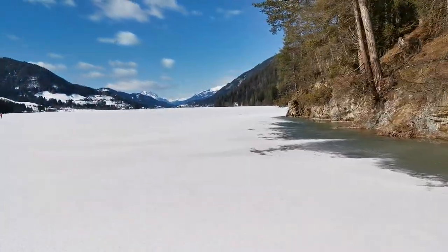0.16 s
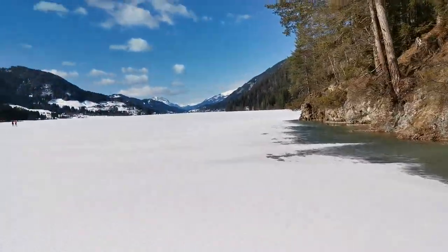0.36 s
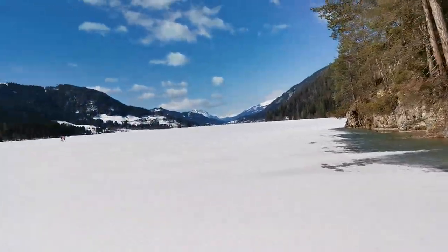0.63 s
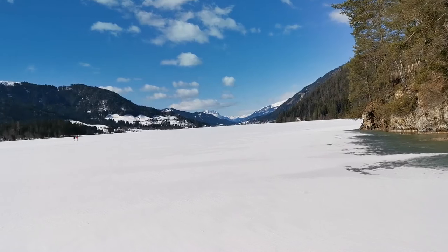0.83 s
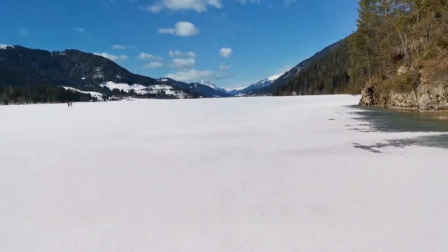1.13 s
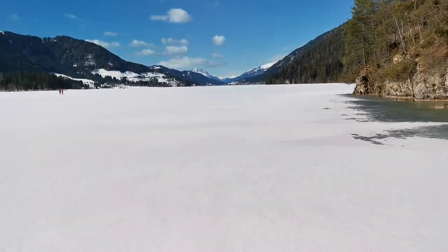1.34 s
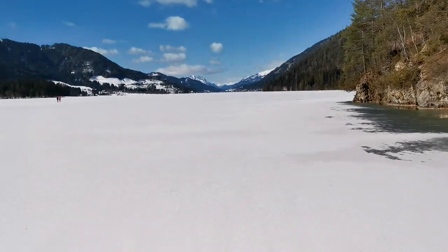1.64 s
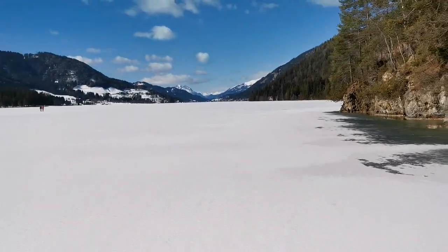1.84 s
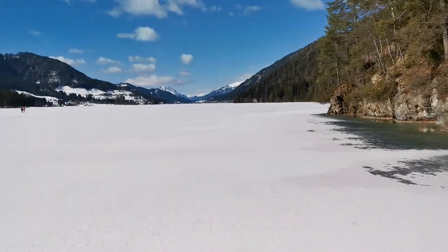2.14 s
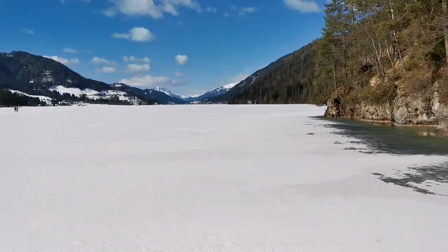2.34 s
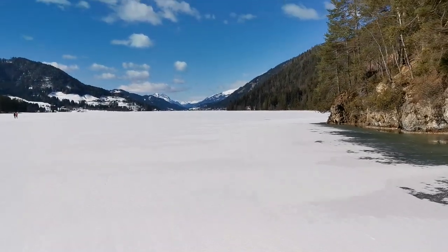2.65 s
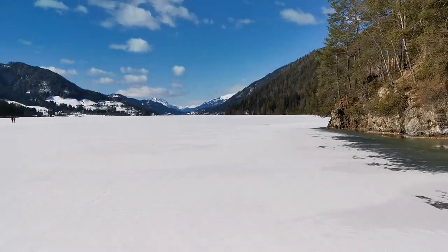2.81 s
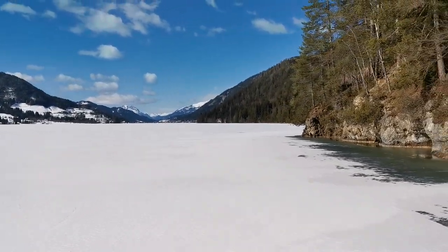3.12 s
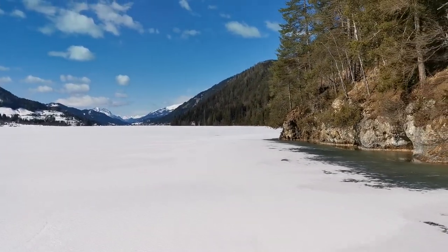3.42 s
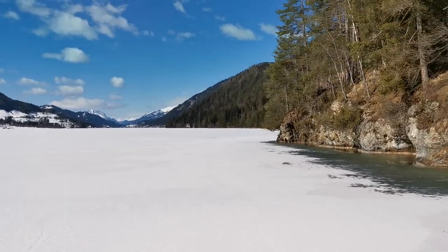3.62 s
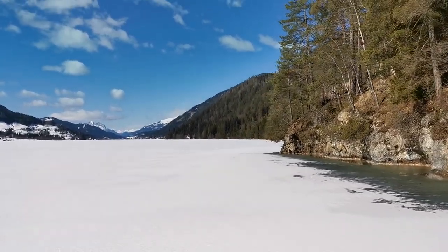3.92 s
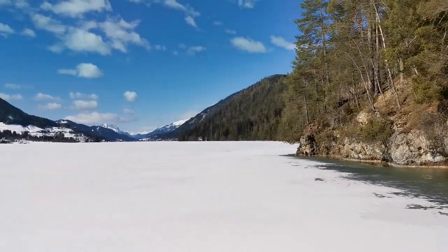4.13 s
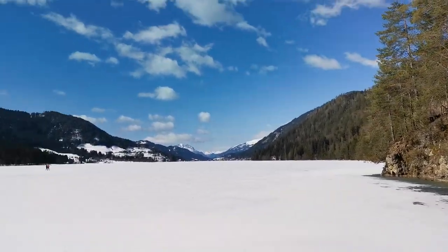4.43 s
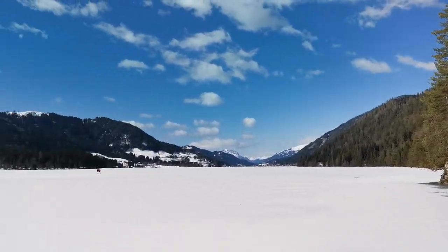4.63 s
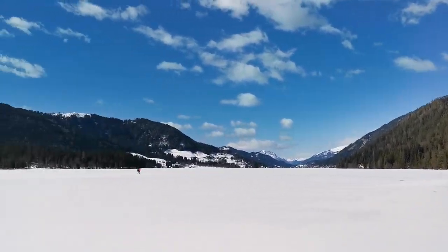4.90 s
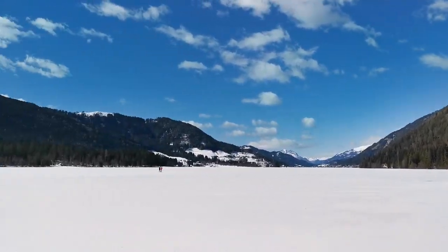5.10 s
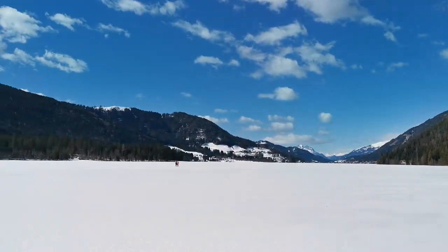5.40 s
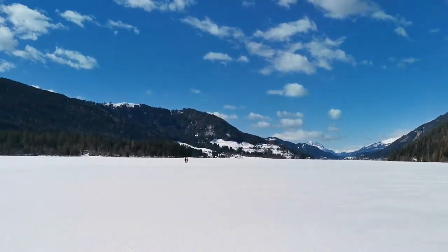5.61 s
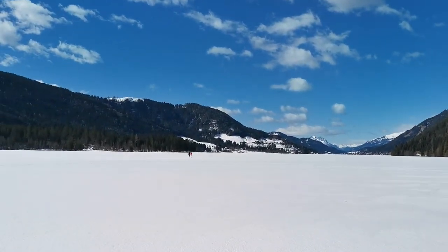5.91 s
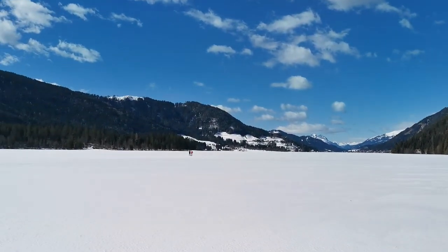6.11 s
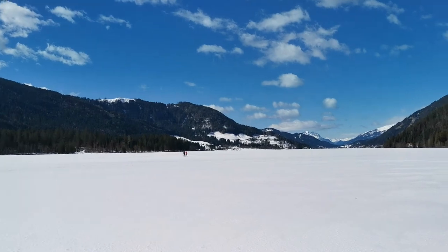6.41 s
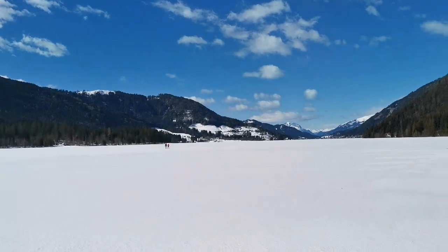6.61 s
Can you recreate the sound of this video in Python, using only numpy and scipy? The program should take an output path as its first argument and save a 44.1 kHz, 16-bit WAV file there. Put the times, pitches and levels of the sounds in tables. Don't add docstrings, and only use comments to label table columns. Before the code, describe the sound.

Close beneath a handheld microphone, skate blades bite crusted lake ice. A dense burst of hard snaps, bright chips and low thumps fills the first second, then thins into irregular ticks and short scrapes over a quiet steel hiss and faint ice drone. A second scrape comes after four seconds. Near the end, heavy wind buffeting swells suddenly, mostly on the right, covering the blades.

```python
import sys
import numpy as np
from scipy import signal
from scipy.fft import rfft, irfft, next_fast_len
from scipy.io import wavfile
from scipy.ndimage import uniform_filter1d, map_coordinates

SR = 44100
rng = np.random.default_rng(int(sys.argv[2]) if len(sys.argv) > 2 else 0)


def ratio_of_db(decibels):
    return 10 ** (np.asarray(decibels, float) / 20)


def inscribe(sig):
    pcm = np.round(np.clip(np.atleast_2d(sig).T, -1, 1) * 32767)
    wavfile.write(sys.argv[1], SR, pcm.astype(np.int16))


N = 297675


def unit(x):
    return x / np.sqrt(np.mean(x ** 2) + 1e-20)


def along(points, hz):
    f, v = np.transpose(points)
    return np.interp(np.log(hz + 1), np.log(f + 1), v)


def wobble(rate):
    knots = rng.standard_normal(int(N * rate / SR) + 4)
    return map_coordinates(knots, [np.arange(N) * rate / SR])


def filtered(x, response):
    m = next_fast_len(N + 8192)
    return irfft(rfft(x, m) * response(np.fft.rfftfreq(m, 1 / SR)), m)[..., :N]


def pulse(points, size=1024):
    cepstrum = irfft(np.log(ratio_of_db(along(points, np.fft.rfftfreq(4096, 1 / SR)))))
    cepstrum[1:2048] *= 2
    cepstrum[2049:] = 0
    fade = np.hanning(2 * size)[size:]
    response = irfft(np.exp(rfft(cepstrum)))[:size] * fade
    return response[None] / np.linalg.norm(response)


def coloured(x, points):
    return signal.fftconvolve(x, pulse(points, size=2048), axes=1)[:, :N]


def fractures(lumpy_db, rate):
    return ratio_of_db(lumpy_db * np.minimum(wobble(rate), 2)) * rng.standard_normal((2, N))


def self_noise():
    return ratio_of_db(-78.5) * rng.standard_normal((2, N))


def swells(s, peak_db, width_s):
    return ratio_of_db(peak_db - 10 * ((np.arange(N) / SR - s) / width_s) ** 2)


def steady(x):
    return x / np.sqrt(np.abs(uniform_filter1d(x ** 2, SR // 16, axis=1)))


# (peak time [s], peak level [dB], time from peak to 10 dB down [s],
# sharp edge over the buffet [dB])
GUSTS = [(.24, -43, 0.08, -30), (.84, -42.5, 0.19, -23), (5.05, -54, 0.31, -30), (5.27, -46.5, 0.6, -5.5),
         (5.43, -41.5, 0.39, -6), (5.53, -35, 0.15, -21), (5.76, -39.5, 0.0855, -26),
         (6.225, -23, 0.01, -2.5), (6.268, -23.5, 0.06, -7), (6.291, -21, 0.0351, 1),
         (6.342, -18, 0.04, -7), (6.415, -22.5, 0.02, -8.5), (6.447, -24, -0.0265, -0.5),
         (6.478, -16.5, 0.0483, -2.5), (6.515, -15.5, 0.028, -6), (6.579, -18.5, 0.04, 3.5),
         (6.605, -17.5, 0.0457, 1.5), (6.635, -16, 0.0421, -1.5), (6.686, -21, 0.006, 1),
         (6.725, -19, -0.0136, -7.5)]
# (frequency [Hz], level [dB])
BUFFET_COLOUR = [(20, -13), (45, -12), (90, 0), (170, 0), (260, -9), (500, -35), (2000, -90)]
# (frequency [Hz], level [dB])
EDGE_COLOUR = [(120, -19), (270, 1.5), (430, -2.5), (800, -13), (1500, -27), (3000, -55), (8000, -87)]
# (frequency [Hz], level [dB])
SWAY_COLOUR = [(15, -22.5), (35, 4), (70, 5), (110, -17.5), (300, -69.5)]


def wind():
    calm_db, calm_edge_db, lee_db = -61, -88.5, -59.5
    full_db = 26.5
    s, peak_db, width_s, edge_db = np.transpose(GUSTS)[..., None]
    right = ratio_of_db(calm_db) + swells(s, peak_db, width_s).max(0)
    edge = ratio_of_db(calm_edge_db) + swells(s, peak_db + edge_db, 0.61 * width_s).max(0)
    gust = right / ratio_of_db(calm_db)
    puff = swells(s=6.165, peak_db=-41.5, width_s=0.018)
    left = ratio_of_db(lee_db) * gust ** 0.36 + puff

    lumps = np.array([wobble(38), wobble(25)])
    slow = steady(coloured(ratio_of_db(2.1 * lumps) * rng.standard_normal((2, N)), BUFFET_COLOUR))
    fast = steady(coloured(ratio_of_db(4.5 * wobble(200)) * rng.standard_normal((1, N)), EDGE_COLOUR))
    sway_response = lambda hz: ratio_of_db(along(SWAY_COLOUR, hz)) * (hz > 10)
    sway = unit(filtered(rng.standard_normal((2, N)), sway_response))

    buffet = np.array([left, right * np.minimum(gust / ratio_of_db(full_db), 1) ** 0.4]) * slow
    spikes = ratio_of_db([[-47], [0]]) * edge * fast
    leak = ratio_of_db(-59.0) * slow[::-1]
    limited = np.minimum(gust, ratio_of_db(full_db))
    push = np.array([ratio_of_db(-76) * limited ** 1.26 + puff, ratio_of_db(-66) * limited ** 1.06])
    return buffet + spikes + leak + push * sway


# (time [s], pressure of the steel [dB], flexing of the sheet [dB])
GLIDE = [(0, -42, -65), (.3, -48, -62), (.6, -46, -49), (1, -44.5, -52), (1.6, -47, -58), (2.3, -45.5, -51),
         (3.2, -45.5, -56), (4, -46, -45), (4.4, -40, -58), (4.7, -49.5, -48), (5.2, -50.5, -46),
         (5.5, -51.5, -59.5), (5.8, -49.5, -47), (6.0, -43, -48.5), (6.15, -51.5, -60), (6.35, -42, -62),
         (6.6, -64, -59), (6.75, -55, -51.5)]
# (frequency [Hz], level [dB])
HISS_COLOUR = [(1200, -27), (2100, -8), (3100, 4.5), (4500, -4), (7300, 1), (8600, -16.5), (10000, -32.5),
               (15500, -33)]
# (frequency [Hz], width [Hz], level [dB])
SHEET_MODES = [(128, 32, 0), (232, 40, -2)]
# (frequency [Hz], level [dB])
THUMP_COLOUR = [(50, -17.5), (120, -2.5), (250, 3), (600, -2.5), (1000, -10.5), (3000, -66), (9000, -100)]
# (frequency [Hz], level [dB])
CRACK_COLOUR = [(150, -56), (500, -4.5), (900, 2), (1200, -2), (1600, -5), (2100, -0.5), (2700, -7),
                (4000, -26), (9000, -99)]


def sheet(f):
    return sum(ratio_of_db(db) * (1j * f * w / (c * c - f * f + 1j * f * w)) ** 2 for c, w, db in SHEET_MODES)


def glide():
    s, slide_points, drone_points = np.transpose(GLIDE)
    t = np.arange(N) / SR
    slide_db = np.interp(t, s, slide_points)
    drone_db = np.interp(t, s, drone_points)
    hiss_db = -55 + 0.57 * (slide_db + 44.5)
    pressure = wobble(35)
    slide = coloured(unit(fractures(lumpy_db=6.5, rate=250) * ratio_of_db(1.3 * pressure)), CRACK_COLOUR)
    hiss = coloured(unit(fractures(lumpy_db=2.5, rate=410) * ratio_of_db(0.5 * pressure)), HISS_COLOUR)
    body = coloured(unit(fractures(lumpy_db=4.5, rate=50) * ratio_of_db(2.0 * pressure)), THUMP_COLOUR)
    drone = unit(filtered(fractures(lumpy_db=4.5, rate=7.9), sheet))
    steel = ratio_of_db(slide_db - 9.0) * slide + ratio_of_db(slide_db - 10.0) * body + ratio_of_db(hiss_db + 0.5) * hiss
    return steel + ratio_of_db(drone_db - 2.1) * drone


def with_give(rows, give_db):
    return [(s, ms, db, give_db, spray_db) for s, ms, db, spray_db in rows]


def alike(rows, ms, spray_db):
    return [(s, ms, db, spray_db) for s, db in rows]


# (frequency [Hz], level [dB])
SPRAY_COLOUR = [(1200, -46.5), (2400, -3), (3000, 2), (4300, 0), (5300, -3.5), (7100, 0), (7800, -5.5),
                (8500, -17), (10000, -29.5), (14300, -36.5), (15500, -45)]


def bites(rows, plates, lumpy_db, rate, first, fade_db, crumbs_db, plate_hz, spread_db):
    grains = np.pad(unit(fractures(lumpy_db, rate)), ((0, 0), (0, SR)), "wrap")
    voices = [pulse(colour) for colour in (THUMP_COLOUR, CRACK_COLOUR, SPRAY_COLOUR)]
    out = np.zeros((2, N + SR))
    rings = rng.standard_normal((len(rows), 2))
    large = np.array(plates)
    for (s, ms, db, thump_db, spray_db), (pitch, strength) in zip(rows, rings):
        start = round(s * SR)
        t = np.arange(round((ms + 12) * SR / 1000)) / SR * 1000
        crumbs = ratio_of_db(crumbs_db - 3.13 * (t - ms))
        envelope = np.where(t > ms, crumbs, ratio_of_db(-fade_db * t / ms))
        run = envelope * grains[:, start:start + len(t)]
        run[:, :24] += first * rng.standard_normal((2, 24))
        near, hz, ring_db = large[np.argmin(abs(large[:, 0] - s))]
        if abs(near - s) > .0045:
            hz = np.clip(plate_hz * ratio_of_db(spread_db * pitch), 500, 2500)
            ring_db = 12 + strength
        b, a = signal.iirpeak(hz, min(3.5, hz / 140), SR)
        plate = ratio_of_db(ring_db) * signal.lfilter(b, a, run)
        drives = run + plate * (hz < 800), run + plate, run
        levels_db = thump_db + 0.205, 0.4, spray_db + 0.37
        for drive, voice, over_db in zip(drives, voices, levels_db):
            sound = signal.fftconvolve(drive, voice, axes=1)
            size = ratio_of_db(db + over_db) * np.sqrt(ms * SR / 1000 / np.sum(sound[0] ** 2))
            out[:, start:start + sound.shape[1]] += size * sound
    return out[:, :N]


# (time [s], crack level [dB], spray over the crack [dB], pitch [Hz])
CHIPS = [(0.223, -25.5, -3, 330), (0.267, -26, -7, 1150), (0.318, -40, -7, 830), (0.395, -41, 2, 1000),
         (0.424, -24.5, -5.5, 1260), (0.583, -22, -11, 890), (0.738, -22.5, -17, 690),
         (0.887, -24.5, -11.5, 910), (0.897, -28.5, -8, 1800), (0.986, -32, -11.5, 650),
         (1.106, -37, -7, 2520), (1.26, -35.5, 4.5, 2190), (1.529, -40.5, 10, 2590),
         (1.579, -33.5, 1, 1950), (1.649, -33.5, -2.5, 980), (2.004, -44, 9.5, 2420),
         (2.133, -34.5, -3, 2540), (2.292, -36.5, -3.5, 610), (2.34, -38, 2, 670), (2.458, -41, 6, 460.6),
         (2.614, -36, -6.5, 830), (2.617, -34.5, -4, 387), (3.142, -39, -2, 550), (3.151, -45, 8, 1980),
         (3.311, -46, -4, 1120), (3.358, -40, -6.5, 1700), (3.643, -34.5, -6.5, 1020),
         (3.679, -36, 1, 2520), (3.793, -41, -19, 870), (4.097, -31, -12, 646), (4.129, -32, -11, 2200),
         (4.378, -40.5, 5, 2100), (4.916, -43.5, -1, 2080), (5.057, -43, -1, 302), (5.187, -44.5, 0, 1595),
         (5.226, -37.5, -19, 407), (5.235, -24, -10.5, 552), (5.903, -42, -7, 400), (5.462, -40, -4, 300),
         (5.657, -39.5, -3.5, 301), (5.686, -45, -4.5, 2440), (5.695, -50.5, 4.5, 1000),
         (5.925, -39, 5, 910), (6.028, -30.5, -9, 2550), (6.098, -37.5, 2, 920), (6.258, -38.5, -6, 2370),
         (6.392, -36, -13.5, 990), (6.404, -30.5, -5.5, 1050), (6.416, -31, -3, 560),
         (6.557, -35, -12, 1380)]
# (time [s], crack level [dB], spray over the crack [dB], pitch
# [Hz])
MORE_CHIPS = [(.009, -26, -2.5, 2060), (.058, -24, -5, 416), (0.161, -27.5, -4, 1200),
              (.598, -22.5, -11, 680), (.651, -35, -3, 1900), (.706, -39, -10, 1800),
              (3.471, -28.5, -11, 1740), (3.476, -30, -12, 1880), (6.296, -39, -7, 420),
              (6.607, -47.5, -2, 1199), (4.311, -26, -11, 400), (4.483, -26.5, -11, 480),
              (4.326, -32.5, -5, 1500)]


def chips():
    all_chips = CHIPS + MORE_CHIPS
    rows = with_give([(s, 2.4, db, spray_db) for s, db, spray_db, hz in all_chips], give_db=-5)
    plates = [(s, hz, 27) for s, db, spray_db, hz in all_chips]
    return bites(rows, plates, lumpy_db=2.0, rate=900, first=1.404, fade_db=4.5, crumbs_db=-16,
                 plate_hz=1000, spread_db=2.1)


# (time of the bite [s], pitch [Hz], ring over the fractures [dB])
PLATES = [(0.204, 1260, -3), (0.227, 1050, 7.5), (0.263, 1120, 11), (0.313, 1120, 26), (0.345, 894, 11),
          (0.405, 930, 20), (0.423, 1210, 25), (0.479, 1130, 15), (0.501, 700, 8), (0.57, 900, 11),
          (0.588, 730, 18), (0.615, 980, 17), (0.683, 1100, 24), (0.694, 716, 8), (0.731, 1280, 20.5),
          (0.77, 730, 14), (0.816, 870, 6), (0.887, 850, -18), (0.975, 376, 0), (1.039, 860, 7),
          (1.113, 1150, 14), (1.139, 485, 5.5), (1.194, 545, -15), (1.275, 1430, 11), (1.378, 240, 5),
          (1.412, 2400, 11), (1.637, 947, 30.5), (1.69, 790, 2), (1.775, 1300, -3), (1.807, 402, 7),
          (2.097, 290, 1), (2.217, 657, 10), (2.334, 590, -10), (2.367, 650, 9.5), (2.444, 480, 16),
          (2.554, 278, 5.5), (2.729, 444, 10), (2.783, 693, 1), (2.908, 1040, 9.5), (3.389, 690, 12),
          (3.468, 550, 5), (3.679, 277, 23), (3.718, 840, 13), (3.757, 814, -2), (3.818, 1050, 6),
          (3.988, 720, 17.5), (4.43, 895, -4), (4.471, 427, 13), (4.571, 548, 13), (4.687, 772, 18.5),
          (5.233, 558, 1), (5.34, 560, -3), (5.868, 2200, 24.5), (6.024, 407, 27), (6.092, 2460, 3.5),
          (6.161, 980, 14), (6.514, 2045, 16), (6.557, 1360, 11), (6.62, 650, -8), (6.715, 1340, 6)]
# (time of the bite [s], pitch [Hz], ring over the fractures [dB])
MORE_PLATES = [
    (.018, 373, 12),
    (.075, 346, 3.8),
    (.133, 239, 9.8),
    (.151, 448, 3),
    (4.207, 757, 1.7),
    (4.3, 421, 7.5),
    (3.494, 1776, 9.3),
]
# (time [s], length [ms], crack level [dB], spray over the crack [dB])
SKIMS = [(.26, 8, -30, -3), (.271, 16, -48, -13), (.315, 11.1, -44.5, 9.5), (.663, 24, -40.5, -6),
         (.889, 13, -29.5, -10), (1.145, 6.8, -31, -9), (1.244, 50.7, -39, 1), (1.283, 7.7, -40, -10),
         (1.296, 34.4, -46, 10.5), (1.362, 23.6, -47, 2.5), (1.455, 37, -44.5, -3.5), (1.483, 13, -40.5, 1),
         (1.532, 30, -47, 3.5), (1.57, 20.6, -41, 1.5), (1.638, 4, -31.5, -2), (1.781, 12, -36.5, -2.5),
         (2.39, 17, -40.5, -3), (2.554, 13.5, -36.5, -11.5), (2.915, 22, -44.5, -6), (3.033, 9, -39, -5.5),
         (3.07, 41, -47, 4), (3.276, 12, -44.5, 1.5), (3.394, 23.4, -44.5, -6), (3.494, 41, -38.5, -2.5),
         (3.624, 31.6, -46, 5), (3.847, 33, -44.5, 1), (4.017, 24.7, -34, 0), (4.125, 16.5, -34, -7.5),
         (5.179, 29, -46, -4), (6.402, 45, -43.5, 2.5)]
# (time [s], length [ms], crack level [dB], spray over the crack [dB])
CARVES = [(0.0, 14.7, -33.5, -3), (2.972, 5, -37, -8), (.151, 19, -34, -1), (.207, 15, -32, -2.5),
          (.501, 9.1, -31, 0), (.557, 16, -50, 9), (.588, 5.7, -23.5, -11), (.694, 6.5, -27, -16),
          (.978, 8.4, -37, 3), (1.761, 5, -41, -3), (1.846, 19.7, -39.5, 4), (2.116, 24.4, -46.5, 0.5),
          (2.217, 3.7, -33, -9.5), (2.266, 14.4, -42, -9), (2.334, 14.7, -37.5, -13),
          (2.579, 45.4, -43, -3.5), (2.64, 9.96, -35, -3), (2.729, 5.4, -32.5, -8.5), (2.94, 44, -45.5, 6),
          (3.122, 19.9, -40.5, 1), (3.468, 8, -31, -9), (4.093, 23.9, -44.5, 3.5), (4.43, 2.9, -27, -13),
          (4.408, 17, -37.5, -0.5), (4.471, 22.55, -32.5, -7.5), (5.233, 11.7, -37, -9),
          (5.868, 10.7, -41, -5.5), (5.95, 12, -45, -2), (6.384, 58, -53, -12.5), (6.62, 7.8, -40.5, -2.5)]
# (time [s], crack level [dB])
RASPS = [(0.82, -45), (0.906, -48), (0.951, -51), (1.825, -51), (1.996, -51.5), (2.066, -47), (2.762, -46),
         (2.822, -48.5), (3.168, -51), (3.373, -49.5), (3.556, -47.5), (4.044, -46), (4.168, -60),
         (3.922, -53.5), (4.744, -53), (4.876, -48.5), (6.105, -57.5), (6.057, -50.5), (6.287, -47.5),
         (6.449, -54), (3.594, -47), (5.545, -55.5)]
# (time [s], length [ms], crack level [dB], spray over the crack [dB])
STROKES = [
    (.019, 50, -30.5, -6.5),
    (.072, 74, -38.5, 2),
    (.141, 19, -37, 1),
    (4.207, 92.4, -36, 1.5),
    (4.3, 40, -35, -4),
]


def scrapes():
    rows = with_give(SKIMS, give_db=-6.5) + with_give(CARVES, give_db=2)
    rows += with_give(alike(RASPS, ms=24.3, spray_db=0.6), give_db=2)
    rows += with_give(STROKES, give_db=-1)
    return bites(rows, PLATES + MORE_PLATES, lumpy_db=3.5, rate=300, first=1.3, fade_db=2.5,
                 crumbs_db=-9.0, plate_hz=1575, spread_db=2.5)


# (time [s], length [ms], crack level [dB], spray over the crack [dB])
CRISP_SNAPS = [(.313, 1.2, -21.5, -31.5), (.347, 1.8, -20, -3), (.406, 2.3, -25.5, -8),
               (.427, 3.1, -25.5, -7), (.479, 1.85, -16, -3.5), (.57, 5.3, -18, -3), (.615, 2.6, -26.5, -3),
               (.676, 7.3, -34.5, -6), (.683, 5, -18, -11), (.731, 2.3, -20.5, -2.5), (.204, 3.1, -23, 0.5),
               (.816, 2.94, -23.5, -10), (1.039, 7.2, -26, -16), (1.044, 8.1, -40, -1),
               (1.087, 2.65, -36, 0.5), (1.412, 4.6, -27, -3.5), (1.517, 1.22, -34, 8),
               (6.515, 4.1, -27, -8), (1.613, 2.44, -32, -1.5), (1.69, 6.5, -34.5, 1),
               (1.735, 1.7, -34, -2.5), (1.775, 1.58, -22, -1.5), (2.908, 8, -36.5, -6.5),
               (3.679, 2.45, -39.5, 1), (3.718, 6.4, -35, -8.5), (3.757, 3.7, -36, -12.5),
               (3.818, 3.5, -35, -4), (6.092, 2.2, -28.5, -3), (6.161, 2.54, -32.5, -4.5),
               (6.715, 6.1, -27, -14)]
# (time [s], length [ms], crack level [dB], spray over the crack [dB])
DEEP_SNAPS = [(.733, 3.7, -38, -17), (.225, 4.4, -27.5, -7), (.771, 6, -31.5, -6), (.975, 1.6, -19, -4),
              (1.113, 5.7, -34, -2.5), (1.139, 3.1, -31.5, -9), (1.194, 5.8, -35.5, -7),
              (1.277, 4, -30, 0.5), (1.417, 7.3, -36, -1), (1.807, 6.1, -37, 0), (2.079, 3.1, -39.5, 0.5),
              (2.097, 3.44, -29, -16), (2.367, 3.22, -32, -5), (2.418, 8.7, -34, -7),
              (2.446, 4.3, -28.5, -4), (2.783, 2.7, -25, -5), (3.348, 4, -39, -3),
              (3.389, 5.1, -28.5, -7.5), (3.68, 1.6, -24, -6), (3.988, 3.7, -30, -17.5),
              (4.149, 6.5, -31, -1.5), (4.509, 8.2, -42.5, 1.5), (4.687, 6.3, -35.5, -21),
              (5.252, 3.3, -30, -6), (5.34, 4.1, -37, -9), (5.487, 4.3, -38.5, -4), (5.519, 4.1, -38, -7.5),
              (6.024, 7.7, -37.5, -10.5), (6.233, 6.9, -35.5, -6), (.263, 3.7, -32, -4)]
# (time [s], crack level [dB])
TICKS = [(4.208, -38.5), (.859, -42), (1.004, -38), (0.24, -39), (1.04, -44.5), (1.895, -40.5),
         (1.935, -41), (2.248, -41), (2.661, -41), (2.873, -43), (2.998, -43), (3.552, -41), (4.007, -42),
         (4.374, -38), (4.571, -36.5), (4.623, -43.5), (4.833, -45.5), (4.198, -42), (5.054, -42),
         (5.889, -40.5), (5.279, -44), (5.385, -44), (5.451, -48), (5.463, -41.5), (5.652, -44),
         (0.13, -30.5), (5.92, -41), (5.5, -48), (6.2, -46), (.344, -35)]
# (time [s], crack level [dB])
DRY_TICKS = [(2.325, -43), (2.493, -43.5), (2.512, -44), (3.243, -43.5), (3.65, -44.5), (3.794, -52),
             (3.903, -44), (3.955, -50), (4.532, -44.5), (4.786, -52), (6.311, -47), (6.542, -44),
             (.286, -41.5), (1.378, -32), (1.867, -34), (5.584, -47.5), (5.813, -47), (4.348, -43)]


def snaps():
    rows = with_give(CRISP_SNAPS, give_db=-13) + with_give(DEEP_SNAPS, give_db=3.5)
    rows += with_give(alike(TICKS, ms=5.2, spray_db=-4.5), give_db=3)
    rows += with_give(alike(DRY_TICKS, ms=5.2, spray_db=-4.5), give_db=2)
    return bites(rows, PLATES + MORE_PLATES, lumpy_db=6.0, rate=1200, first=2.0, fade_db=5.0,
                 crumbs_db=-13.5, plate_hz=1014, spread_db=3.0)


# (frequency [Hz], right over left [dB])
SHADE = [(300, 0), (860, 3), (1400, 8), (1720, 10), (2070, 5), (2550, -9), (2950, -3), (3400, 0),
         (4300, -5), (5300, -3), (6350, -13), (7000, -8), (8400, -2), (9600, -5), (11500, 2)]
# (frequency [Hz], lead of the left port [rad])
LEAD = [(0, 0), (1210, -1.5), (1550, -1.3), (2070, -0.6), (2410, -0.4), (2840, -3.3), (4310, -3.7),
        (4910, -5.6), (6030, -6.7), (6550, -9.0), (7150, -9.9), (7920, -11.9), (8180, -12.4), (8790, -12.5)]
# (frequency [Hz], common share [0-1])
ALIKE = [(60, .85), (200, .98), (3500, .97), (5000, .84), (8500, .76), (10000, .45), (14000, .3)]


def ports(pair):
    f, radians = np.transpose(LEAD)

    def to_right(hz):
        share = np.clip(along(ALIKE, hz), 0, 1)
        path = ratio_of_db(along(SHADE, hz)) * np.exp(-1j * np.interp(hz, f, radians))
        return path * [share, np.sqrt(1 - share ** 2)]

    right = filtered(pair, to_right)
    return np.array([pair[0], right.sum(0)])


def scene():
    blades = glide() + chips() + scrapes() + snaps()
    return self_noise() + wind() + ports(blades)


def top_cut(x):
    return signal.sosfilt(signal.butter(12, 14900, fs=SR, output="sos"), x)


def record(dry):
    ceiling = 0.86
    held = dry / (1 + np.abs(dry / ceiling) ** 4) ** .25
    closing = np.minimum(np.arange(N)[::-1] / 200, 1)
    return top_cut(held * closing)


dry = scene()
out = record(dry)
inscribe(out)
```